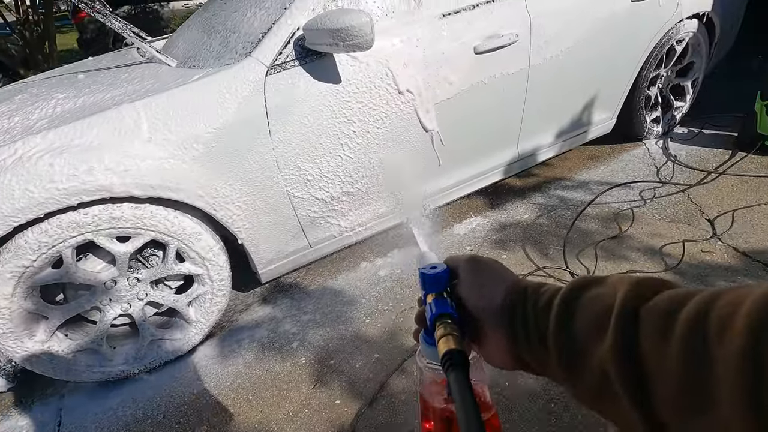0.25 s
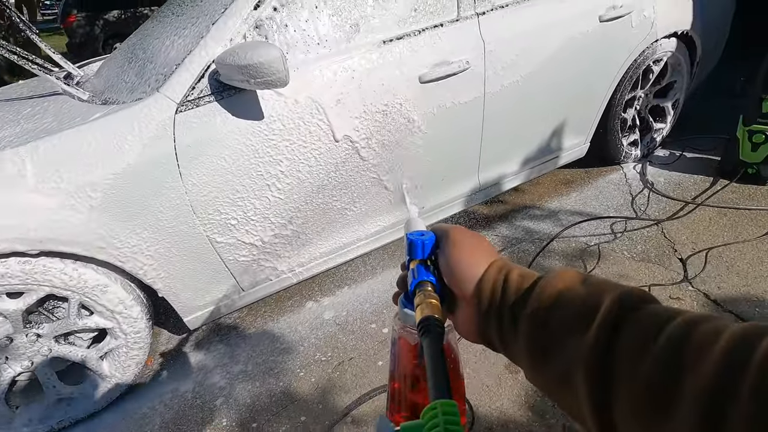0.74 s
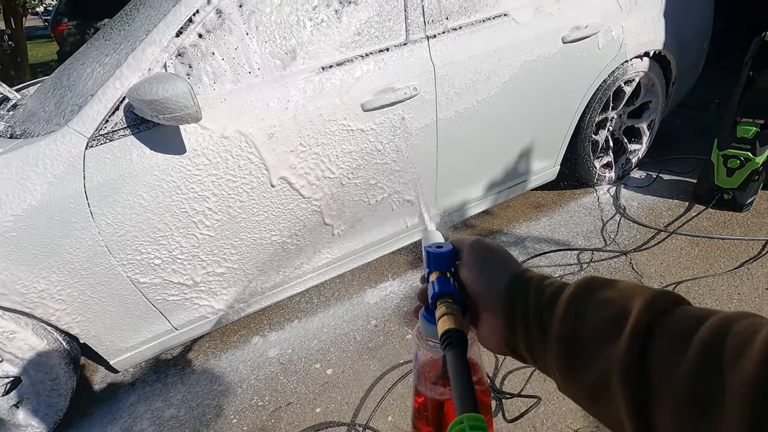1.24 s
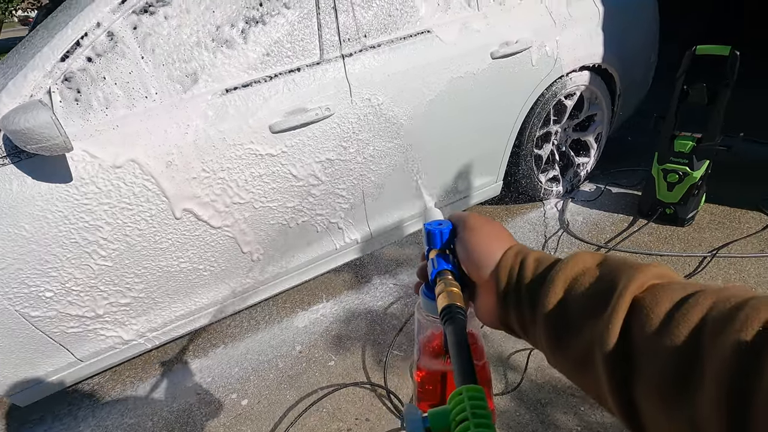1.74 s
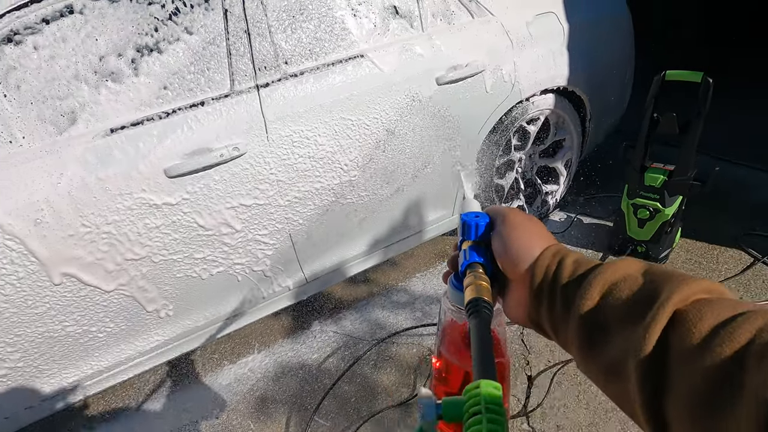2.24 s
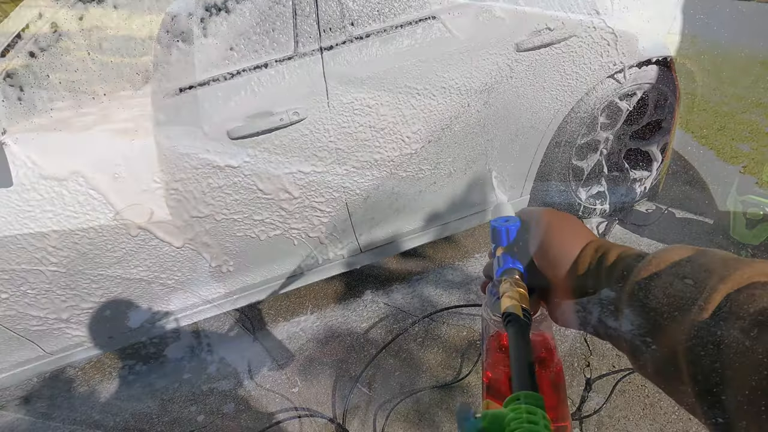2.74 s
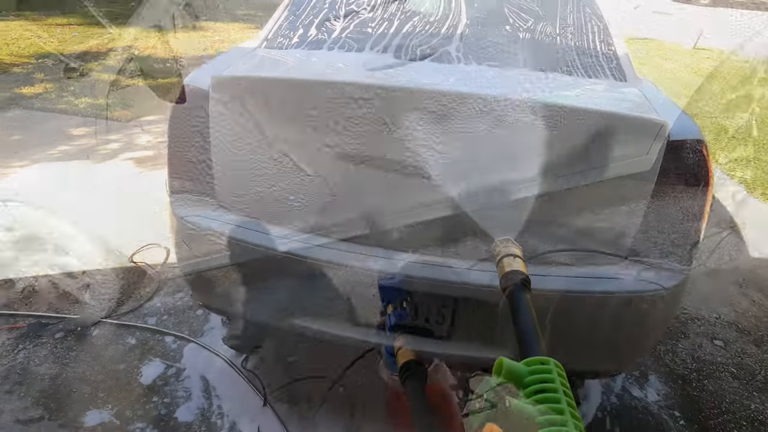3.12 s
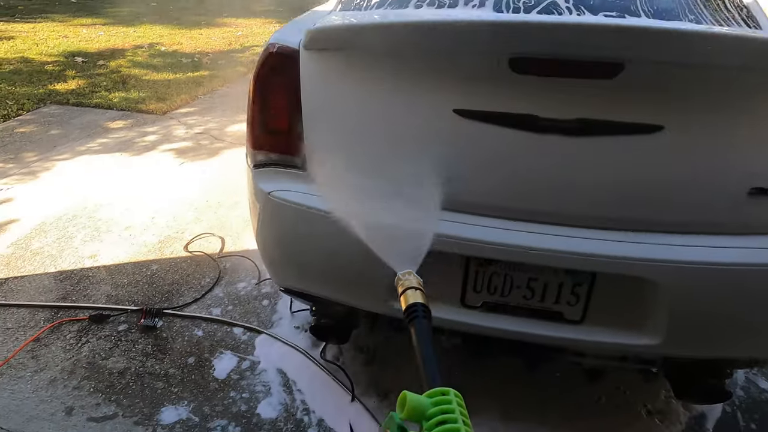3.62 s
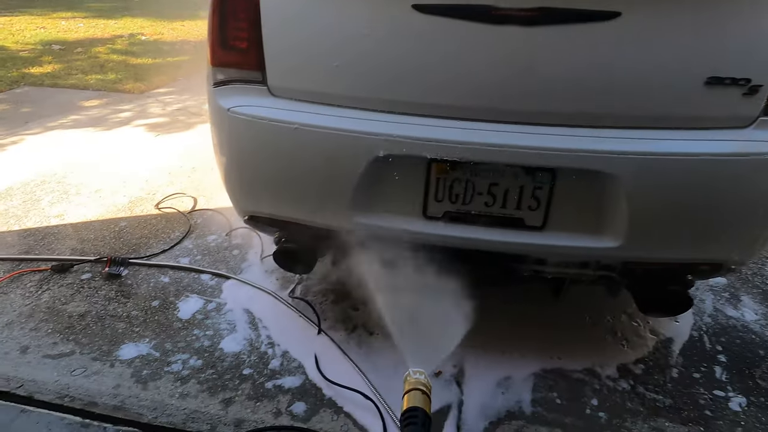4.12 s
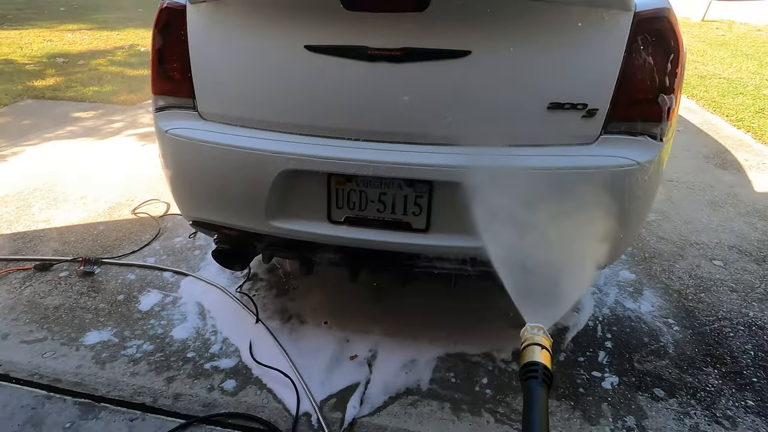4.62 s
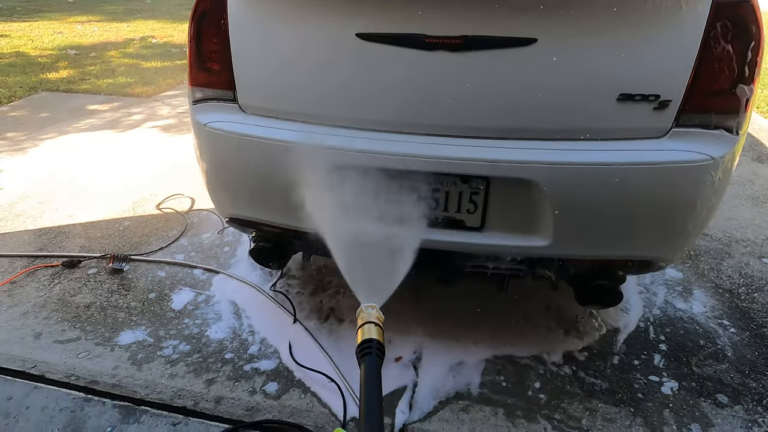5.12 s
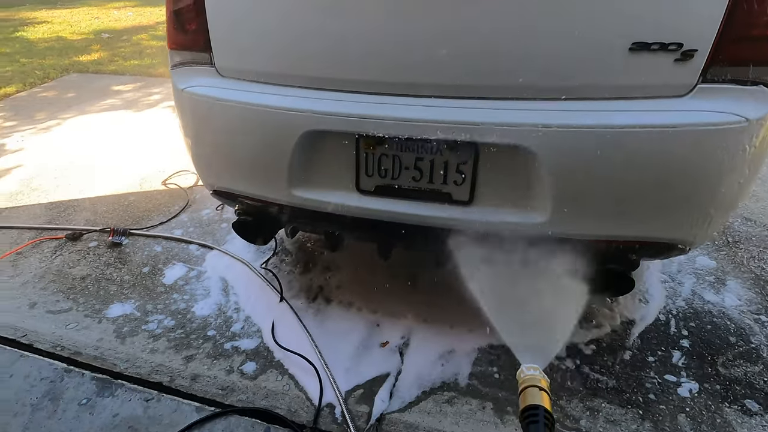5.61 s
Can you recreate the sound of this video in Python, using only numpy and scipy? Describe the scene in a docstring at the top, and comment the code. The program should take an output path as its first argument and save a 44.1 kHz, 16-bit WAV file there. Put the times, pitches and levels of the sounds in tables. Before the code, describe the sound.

A foam lance sputters softly over a faint pump hum, then dissolves into a much louder pressure-washer rinse, hissing and drumming on a car with a whining pump.

```python
"""Electric pressure washer, foam and then rinse

First a foam lance sputters along a car door, its spray made of noise and random drops, over a lightly loaded pump.
This dissolves into a louder rinse of boot lid and bumper: hissing noise, drumming, and a pump slowed by the load.
An 11-tooth motor pinion drives a 50-tooth gear on a three-piston pump, built from tones at multiples of the turning
shaft and a repeating rattle. Wind, as low noise and single puffs, brushes the chest-worn microphone."""
import sys
import numpy as np
from scipy import signal
from scipy.fft import rfft, irfft, next_fast_len
from scipy.io import wavfile
from scipy.ndimage import uniform_filter1d, map_coordinates

SR = 44100
rng = np.random.default_rng(int(sys.argv[2]) if len(sys.argv) > 2 else 0)


def persist_wave(psi):
    """Save psi, clipped to +-1, as 16-bit WAV."""
    counts = np.round(np.clip(psi, -1, 1) * 32767).astype(np.int16)
    wavfile.write(sys.argv[1], SR, np.atleast_2d(counts).T)


N = 258426

PINION, GEAR = 11, 50  # teeth
# Colour of the fine mist. Each row: frequency in Hz, relative strength in dB.
MIST_COLOUR = [(5880, -15.5), (10000, -3), (11100, -8.5), (13800, -3.5), (15500, -14)]


def foaming():
    """Airy foam sputters from the lance; a close reflection combs it; the pump runs fast."""
    # The foam spray. Each row: time in seconds, level in dB.
    spray_levels = [(0.0, -34), (.1, -37.5), (0.46, -39), (.63, -36.5), (.85, -34), (1.06, -34.5),
                    (1.2, -41), (1.27, -36), (1.4, -37), (1.58, -43), (1.73, -38.5), (1.85, -52.5),
                    (2.18, -47.5), (2.27, -44), (2.45, -45.5), (2.62, -51)]
    # Colour of the spray. Each row: frequency in Hz, relative strength in dB.
    spray_colour = [(1000, -53), (1600, -3), (2400, -4.5), (3300, -4.5), (5000, 7), (6200, 4.5),
                    (8570, 6.5), (10500, -14.5), (13000, -87)]
    # Low and high hum of the pump. Each row: time in seconds, shaft tone in dB, gear mesh tone in dB.
    hum_levels = [(0, -53, -52), (.3, -55, -52), (.6, -44, -50), (.8, -54, -50), (1.5, -50, -54),
                  (1.87, -45.5, -66), (2.02, -44, -55), (2.2, -55, -53), (2.47, -53.5, -54),
                  (2.65, -60, -55)]
    # Tones that swell once: 3rd, 6th, 9th multiple of the pump shaft, 7th and 10th of the motor.
    # Each row: usual level in dB, top level in dB, time of the top in seconds, spread in seconds.
    swelling_tones = [(-72, -54.5, 1.87, 0.88), (-60.5, -49.5, 1.3, 0.49), (-67, -51.5, 0.049, 0.13),
                      (-59, -51.5, 2.33, 0.11), (-66, -51.5, 1.7, 0.46)]
    # Steadier pump tones. Each row: multiple of the pump shaft, level against the roar in dB.
    pump_tones = [(8, -17)]
    # Steadier motor tones. Each row: multiple of the motor shaft, level against the roar in dB.
    motor_tones = [(9, -17)]
    # Colour of the casing roar. Each row: frequency in Hz, relative strength in dB.
    roar_colour = [(110, -19), (150, -18.5), (380, -12), (470, -4), (700, -2), (940, -7), (1300, -13),
                   (2300, -11), (4300, -5.5), (5500, -10), (8000, -44)]

    t = np.arange(N) / SR
    spray_db = columns(spray_levels)[0]
    louder_db = spray_db + 40  # mist and roar are set for a spray of -40 dB
    mist_db = -63 + 3.63 * louder_db
    roar_db = -42.5 + 0.2 * louder_db
    flow = droplets(1500., scatter_db=0.5, share=0.82, sputter_db=2.14, spit_ms=9.6,
                    patchy_db=np.full(N, 2))
    mist = undb(mist_db) * unit(colour(flow, MIST_COLOUR))
    spray = undb(spray_db) * unit(colour(flow, spray_colour)) + mist
    spray = spray - reflection(spray)

    orders = (1, GEAR, 3, 6, 9, 7 * GEAR / PINION, 10 * GEAR / PINION)
    lead_db = columns(hum_levels) + [swell(*row) for row in swelling_tones]
    pump = machine(shaft(95.92), roar_db, roar_colour, orders, lead_db, pump_tones, motor_tones,
                   knock_db=-8, lumpy_db=4.0, flutter_db=(1.5, 3.2, 2.3, 3.2, 3.9, 4.2, 6.6))
    fade = np.interp(t, (2.6, 2.95), (1, 0))  # the foam dies away, seconds
    return (spray + intake(spray_db) + gurgles() + spits() + pump) * fade


def reflection(spray):
    """A patchy copy of the spray arrives about a millisecond late, growing as the lance nears the body."""
    # The close reflection. Each row: time in seconds, delay in milliseconds.
    bounce_lags = [(0, 1.15), (.55, 1.09), (.67, 1.0), (.77, 1.035), (.87, 1.0), (1.05, 1.09), (1.19, 1.02),
                   (1.27, 1.045), (1.43, .995), (1.55, .97), (1.71, 1.03), (1.83, .995), (1.93, .99),
                   (2.13, .935), (2.3, .98), (2.46, 1.08), (2.6, 1.15)]
    # Its colour. Each row: frequency in Hz, change of level in dB.
    bounce_colour = [(2000, -10), (4800, 0), (13000, 0), (16000, -6)]
    # hand and sleeve never hold still, so the reflection wobbles
    lag_ms = columns(bounce_lags)[0] + .004 * walk(9)
    start_share, growth_per_s = 0.25, 0.31
    strength = np.minimum(start_share + growth_per_s * np.arange(N) / SR, .7)
    strength = strength * (1 + 0.12 * walk(7.08))
    echo = patchy(colour(spray, bounce_colour), np.full(N, 3.5), 12., width_hz=1496.0)
    return strength * map_coordinates(echo, [np.arange(N) - lag_ms * SR / 1000], order=3)


def rinsing():
    """A hard fan jet hisses on boot lid and bumper and drums them; the pump labours close by."""
    # Brief dips of the rinse. Each row: time in seconds, depth in dB before each layer's share, spread in seconds.
    dips = [(4.14, -3.5, 0.046), (4.248, -6, 0.011), (4.42, -3.5, 0.01), (4.469, -6.5, 0.0046),
            (4.751, -1.5, 0.1), (5.419, -4.5, 0.0092), (5.53, -3.5, 0.041), (5.74, -7.5, 0.051)]
    # How strongly jet, mist, roar, drumming and patter follow the dips, as factors.
    dip_shares = (1.07, 1.84, 1.01, 2, 1.3)
    # Change of jet, mist, roar, drumming and patter once the jet is off the lid, in dB.
    off_lid_steps = (0, -5, 0.5, -7.5, -6)
    # The load eases a little as the jet leaves the lid. Each row: time in seconds, pump shaft speed in Hz.
    shaft_speed = [(3.9, 81.5), (4.15, 81.68), (4.55, 81.6), (5.0, 81.5)]
    # Colour of the jet. Each row: frequency in Hz, relative strength in dB.
    jet_colour = [(1800, -12.5), (3000, -6), (4500, 0.5), (5850, -8.5), (6700, -6.5), (8250, 0.5),
                  (9700, -7), (11000, -63), (14000, -32)]
    # Piston strokes in the water. Each row: multiple of the pump shaft, level in dB before the drumming level.
    hose_pulse = [(1, -10), (2, -6), (3, -1.1), (GEAR / PINION, -2), (5, -4)]
    # Colour of the drumming. Each row: frequency in Hz, relative strength in dB.
    drum_colour = [(70, -18), (160, -11), (240, -9), (480, -3), (700, -14.5), (1000, -14)]
    # Colour of the patter. Each row: frequency in Hz, relative strength in dB.
    patter_colour = [(800, -17), (1150, 12.5), (1700, 2.5), (2200, -51)]
    # Tones that come and go as the listener moves, before the fade-in.
    # Each row: time in seconds, gear mesh tone in dB, 58th multiple of the pump shaft in dB.
    whine_levels = [(2.72, -54, -55), (3.0, -31.5, -45), (3.2, -34.5, -35), (3.36, -25, -39),
                    (3.54, -28.5, -37), (3.61, -35, -37), (3.7, -20.5, -34), (3.77, -38, -37),
                    (3.83, -27, -41), (3.94, -36, -44), (3.98, -27.5, -42), (4.1, -27, -43),
                    (4.15, -46, -44), (4.22, -25, -44), (4.27, -33, -34), (4.37, -23.5, -31),
                    (4.43, -34.5, -39), (4.56, -28, -33), (4.61, -44, -38), (4.71, -30, -36),
                    (4.89, -35, -32.5), (5.01, -29, -31.5), (5.1, -46, -39), (5.2, -28.5, -30.5),
                    (5.33, -25.5, -29), (5.45, -33.5, -38), (5.65, -21, -33), (5.8, -31, -49)]
    # The 6th, 9th and 12th multiple of the pump shaft, before the fade-in and the dips.
    # Each row: usual level in dB, top level in dB, time of the top in seconds, spread in seconds.
    swelling_tones = [(-46.5, -31, 3.436, 0.53), (-42.5, -32, 4.97, 0.51), (-44, -35, 5.06, 0.3)]
    # Steadier pump tones. Each row: multiple of the pump shaft, level against the roar in dB.
    pump_tones = [(11, -15.5), (17, -14.5), (21, -16), (24, -15.5), (27, -11.5), (30, -14), (33, -17),
                  (57, -21), (100, -10)]
    # Steadier motor tones. Each row: multiple of the motor shaft, level against the roar in dB.
    motor_tones = [(8, -17), (9, -12), (10, -18), (12, -14)]
    # Colour of the casing roar. Each row: frequency in Hz, relative strength in dB.
    roar_colour = [(200, -11), (480, -5), (750, 2), (1000, -0.5), (1250, -6.5), (1650, 2.5), (2000, 2),
                   (3600, -6), (6000, -1), (8000, -39)]
    # Moments when the middle goes hollow. Each row: time in seconds, depth in dB, spread in seconds.
    hollows = [(4.24, -13, 0.036), (4.47, -6, 0.028), (4.65, -7, 0.026), (4.77, -8.5, 0.039),
               (4.98, -7, 0.095), (5.44, -9.5, 0.052)]
    # The band that thins in the hollows. Each row: frequency in Hz, share of the sound in dB.
    hollow_band = [(950, -30), (1120, 0), (1750, 0), (2050, -30)]
    # The bass band that drops out. Each row: frequency in Hz, share of the sound in dB.
    bass_band = [(10, 0), (190, 0), (220, -30)]

    t = np.arange(N) / SR
    # the rinse comes up over this span in seconds, amplitude as the 0.99 power of time
    rise_db = 20 * 0.99 * np.log10(np.interp(t, (2.638, 3.455), (1e-4, 1)))
    off_lid = np.clip((t - 4.1) / 0.052, 0, 1)  # at 4.1 s the jet drops from the boot lid to the bumper
    dips_db = sum(swell(0, db, s, width) for s, db, width in dips)
    base_db = (-24.5, -29.5, -28.5, -44, -36)  # jet, mist, roar, drumming, patter
    jet_db, mist_db, roar_db, drum_db, patter_db = (
        db + rise_db + off_lid * step + share * dips_db
        for db, step, share in zip(base_db, off_lid_steps, dip_shares))

    turns = shaft(columns(shaft_speed)[0])
    patchy_db = 1 + off_lid * (2.5 - 1)  # patchier on the bumper than on the lid
    flow = droplets(2800.0, scatter_db=19.0, share=0.12, sputter_db=0.73, spit_ms=14.0, patchy_db=patchy_db)
    mist = undb(mist_db) * unit(colour(flow, MIST_COLOUR))
    jet = undb(jet_db) * unit(colour(flow, jet_colour)) + mist
    # the water carries the piston strokes to the panel
    strokes = sum(undb(db) * tone(turns, k, waver_db=2.5) for k, db in hose_pulse)
    drum = undb(drum_db) * (undb(7.5) * unit(colour(flow, drum_colour)) + strokes)
    patter = undb(patter_db) * unit(colour(flow, patter_colour))

    mesh_db, second_db = (db + np.minimum(rise_db + 17, 0) for db in columns(whine_levels))
    # a slightly eccentric gear gives the mesh tone a neighbour on either side
    orders = (6, 9, 12, 58, GEAR, GEAR - 1, GEAR + 1)
    lead_db = [swell(*row) + rise_db + dips_db for row in swelling_tones]
    lead_db += [second_db, mesh_db, roar_db - 11.5, roar_db - 17]
    pump = machine(turns, roar_db, roar_colour, orders, lead_db, pump_tones, motor_tones,
                   knock_db=-3.5, lumpy_db=2.5, flutter_db=(1.3, 1.5, 2.0, 1.1, 0.31, 3.9, 3.7))

    # the bass drops out within 0.02 s and creeps back over about 1.2 s
    since_drop = t - 4.56
    bass_db = -13.5 * np.clip(since_drop / .02, 0, 1) * np.exp(-np.maximum(since_drop, 0) / 1.2)
    hollow_db = sum(swell(0, db, s, width) for s, db, width in hollows)
    rinse = thin(jet + drum + patter + pump, hollow_band, hollow_db)
    return thin(rinse, bass_band, bass_db)


def droplets(rate, scatter_db, share, sputter_db, spit_ms, patchy_db):
    """Hiss with single drops in it; the treble spits, each spit sudden and dying away; lower down it stays smooth."""
    chance = rng.random((N, 4)).T
    size_db = np.minimum(-abs(scatter_db) * np.log(1 - chance[1]), 14.)
    sizes = undb(size_db) * np.sign(chance[2] - .5)
    drops = unit((chance[0] < rate / SR) * sizes)  # rate in drops per second
    share = np.clip(share, 0, 1)
    mix = np.sqrt(1 - share) * rng.standard_normal(N) + np.sqrt(share) * drops
    # about 70 spits a second, each fading exponentially
    starts = (chance[3] < 70. / SR) * chance[1]
    bursts = signal.lfilter([1], [1, -np.exp(-1000 / (spit_ms * SR))], starts)
    sputter = np.minimum(unit(bursts - bursts.mean()), 3.)
    rough = unit(mix * undb(sputter_db * sputter))
    low, high = (signal.butter(2, 5200., kind, fs=SR, output="sos") for kind in ("low", "high"))
    flow = signal.sosfilt(high, rough) + signal.sosfilt(low, rng.standard_normal(N))
    return patchy(flow, patchy_db, 40., width_hz=805.0)


def intake(spray_db):
    """A fluttering band of noise whose centre wanders; it follows the spray."""
    # The noise band. Each row: time in seconds, centre in Hz, level against the spray in dB.
    band_path = [(0.35, 2905, -14), (.7, 2754, -9), (1.4, 2777, -15.5), (1.7, 2880, -7.5),
                 (2.17, 3040, -20), (2.24, 3050, -8), (2.42, 3010, 0.5), (2.62, 2890, -1), (2.75, 3000, 1)]
    sos = signal.butter(2, 120., fs=SR, output="sos")
    slow = [signal.sosfilt(sos, rng.standard_normal(N)) for _ in range(2)]
    hz, share_db = columns(band_path)
    phase = 2 * np.pi * np.cumsum(hz + 50.35 * walk(2.5)) / SR  # wander in Hz
    db = spray_db + share_db + 3.8 * walk(39.56)
    # slow noise times a tone becomes a noise band around that tone
    return undb(db) * unit(slow[0] * np.cos(phase) + slow[1] * np.sin(phase))


def gurgles():
    """Soap gurgles in the bottle under the lance: short hollow bursts of noise, each round its own pitch."""
    # The bursts. Each row: time in seconds, level in dB, pitch in Hz, spread in seconds.
    bursts = [(.7, -43, 854, 0.016), (1.16, -45.5, 716, 0.037), (1.3, -53, 720, 0.027),
              (1.41, -51, 703, 0.038), (1.54, -44, 736, 0.012), (1.69, -43.5, 700, 0.043),
              (1.82, -39, 597, 0.0092), (2.11, -52, 720, 0.011), (2.41, -45.5, 634, 0.036),
              (2.51, -42, 587, 0.028), (2.58, -48, 600, 0.041)]
    t = np.arange(N) / SR
    sos = signal.butter(4, 96, fs=SR, output="sos")  # Hz to either side of the pitch
    slow = [unit(signal.sosfilt(sos, rng.standard_normal(N))) for _ in range(2)]
    total = np.zeros(N)
    for s, db, hz, width in bursts:
        phase = 2 * np.pi * hz * t
        band = slow[0] * np.cos(phase) + slow[1] * np.sin(phase)
        total += undb(db) * np.exp(-((t - s) / width) ** 2 / 2) * band
    return total


def spits():
    """Air pockets burst at the nozzle: short high rings that rise and die within milliseconds."""
    # The loudest spits. Each row: start in seconds, top of the envelope in dB, pitch in Hz.
    bursts = [(0.846, -24, 8400), (0.946, -22, 6050), (2.3165, -26, 8550), (2.3695, -28, 8200),
              (2.4069, -29, 8120)]
    rise_ms = 0.76
    total = np.zeros(N)
    for s, db, hz in bursts:
        age = np.clip((np.arange(N) / SR - s) * 1000 / rise_ms, 0, 40)
        envelope = np.e * age * np.exp(-age)
        total += undb(db) * envelope * np.sin(2 * np.pi * hz * age * rise_ms / 1000)
    return total


def machine(turns, roar_db, body, lead_orders, lead_db, pump, motor, knock_db, lumpy_db, flutter_db):
    """Fan and brush roar in the casing, piston knocks once a turn, and the tones of pump, motor and gear."""
    lumpy = patchy(rng.standard_normal(N), np.full(N, lumpy_db), 20.76, width_hz=365.0)
    roar = unit(colour(lumpy, body))
    # the same rattle comes round on every turn of the shaft, slowly changing
    pattern = rng.standard_normal((24, 512))
    place = [np.linspace(0, len(pattern) - 1, N), turns % 1 * pattern.shape[1]]
    knocks = unit(colour(map_coordinates(pattern, place, order=1, mode="grid-wrap"), body))
    steady = sum(undb(db) * tone(turns, round(k), waver_db=2.2) for k, db in pump)
    # the motor turns faster than the pump by the ratio of the teeth
    steady = steady + sum(undb(db) * tone(turns, round(k) * GEAR / PINION, waver_db=2.2) for k, db in motor)
    lead = sum(undb(db) * undb(flicker * walk(25.06)) * tone(turns, k, waver_db=1.3)
               for k, db, flicker in zip(lead_orders, lead_db, flutter_db))
    return undb(roar_db) * (roar + undb(knock_db) * knocks + steady) + lead


def shaft(hz):
    """Turns of the pump shaft so far, its speed wandering very slightly."""
    return np.cumsum(hz * (1 + 0.000388 * walk(4))) / SR


def tone(turns, order, waver_db):
    """One multiple of a turning shaft, rms near 1; it swells and sinks as the listener moves among the echoes."""
    return np.sqrt(2) * undb(waver_db * walk(5.06)) * np.sin(2 * np.pi * (order * turns + rng.random()))


def wind():
    """Low buffeting on the microphone, a few single puffs, and its own hiss."""
    # Gusts. Each row: time in seconds, top level in dB, half of the spread in seconds.
    gusts = [(.55, -50, 0.075), (1.95, -53.5, 0.12), (3.65, -55, 0.36), (4.15, -47, 0.19),
             (4.451, -48, 0.015), (4.53, -46, 0.014), (5.4, -61, 0.27)]
    # Colour of the buffeting. Each row: frequency in Hz, relative strength in dB.
    gust_colour = [(12, 2.5), (30, -12), (60, -10), (120, -11), (300, -23)]
    # Single puffs, before smoothing. Each row: time in seconds, peak in dB, length in milliseconds.
    puff_list = [(4.085, -35, 10), (4.291, -34, 9), (4.484, -25, 6.8)]
    # Colour of the hiss. Each row: frequency in Hz, relative strength in dB.
    hiss_colour = [(3000, -29), (9000, -1), (16000, -6)]

    t = np.arange(N) / SR
    # a puff: suction builds up, then snaps over into a push that dies away
    puffs = np.zeros(N)
    for s, db, ms in puff_list:
        u = np.clip((t - s) * 1000 / ms, -20, 20)
        puffs += undb(db) * np.where(u < 0, -0.7 * np.exp(-u ** 2 / 2), np.exp(-u))
    puffs = signal.sosfilt(signal.butter(2, 350., fs=SR, output="sos"), puffs)
    calm_db, hiss_db = -66, -60
    strength = undb(calm_db) + sum(undb(swell(-95.0, db, s, width * 2)) for s, db, width in gusts)
    buffet = strength * unit(colour(rng.standard_normal(N), gust_colour))
    return buffet + puffs + undb(hiss_db) * unit(colour(rng.standard_normal(N), hiss_colour))


def patchy(x, db, rate, width_hz):
    """Splashes come and go in patches: each region of the spectrum swells on its own; db is a curve."""
    hz, s, cells = signal.stft(x, SR, nperseg=256)
    knots = rng.standard_normal((128, 256))  # random levels over frequency and time
    place = np.meshgrid(hz / width_hz % 127, s * rate % 255, indexing="ij")
    depth = np.interp(s, np.arange(N) / SR, db)
    gain = undb(depth * map_coordinates(knots, place, order=3))
    return signal.istft(cells * gain, SR, nperseg=256)[1][:N]


def swell(usual_db, top_db, s, width):
    """A level that rises to one rounded top and sinks back."""
    return usual_db + (top_db - usual_db) * np.exp(-((np.arange(N) / SR - s) / width) ** 2 / 2)


def thin(x, band, db):
    """Lower one band by a curve of dB."""
    return x - (1 - undb(db)) * colour(x, band)


def walk(rate):
    """Random levels, rate of them a second, smoothed twice so they glide; spread near 1."""
    k = int(SR / rate)
    steps = np.repeat(rng.standard_normal(N // k + 1), k)
    return 1.22 * uniform_filter1d(uniform_filter1d(steps, k), k)[:N]


def colour(x, points):
    """Shape the spectrum along (Hz, dB) points; practically silent outside them."""
    size = next_fast_len(N)
    hz, db = np.transpose(points)
    bins = np.log(np.arange(1, size // 2 + 2) * SR / size)
    gain = undb(np.interp(bins, np.log(hz), db, left=-120, right=-120))
    return irfft(rfft(x, size) * gain, size)[:N]


def columns(table):
    """Every column of a curve table after the times, sample by sample."""
    s, *cols = np.transpose(table)
    return [np.interp(np.arange(N) / SR, s, c) for c in cols]


def unit(x):
    """Scale a sound to an rms of 1."""
    return x / np.sqrt(np.mean(x ** 2))


def undb(db):
    """Turn dB into an amplitude factor."""
    return 10 ** (np.asarray(db) / 20)


def scene():
    """Foam, rinse and wind together; a faint late, smeared copy makes left and right differ."""
    # Colour of the difference between the ears. Each row: frequency in Hz, level against the middle in dB.
    side_colour = [(60, -50), (170, -20), (400, -27), (1300, -52)]
    mid = foaming() + rinsing() + wind()
    smear = rng.standard_normal(1024) * np.exp(-np.arange(1024) / 300)
    late = signal.fftconvolve(mid, smear / np.linalg.norm(smear))[:N]
    side = colour(late, side_colour)
    return np.array([mid + side, mid - side])


def record(dry):
    """The recorder cuts the top: a very steep filter removes what lies above 15670 Hz."""
    return signal.sosfilt(signal.ellip(12, .2, 90, 15670, fs=SR, output="sos"), dry)


dry = scene()
out = record(dry)
persist_wave(out)
```